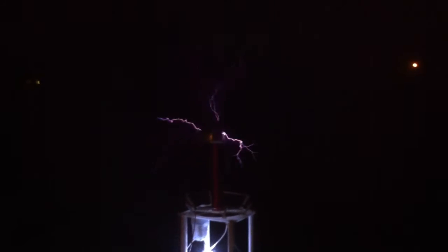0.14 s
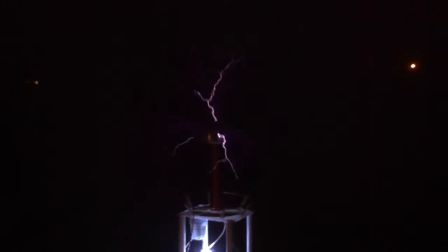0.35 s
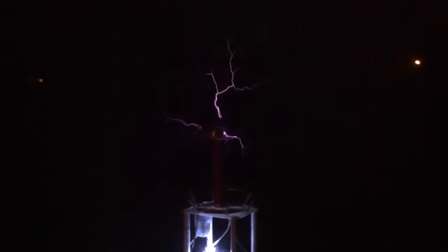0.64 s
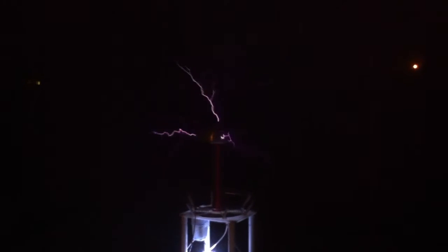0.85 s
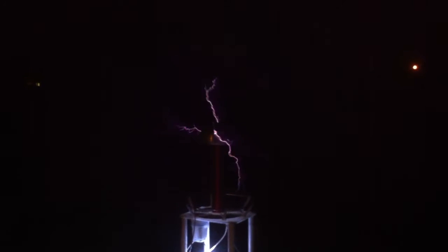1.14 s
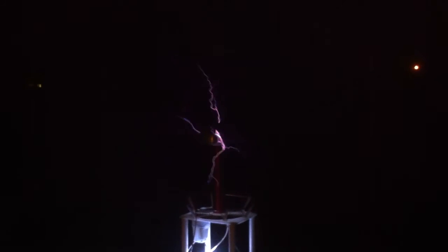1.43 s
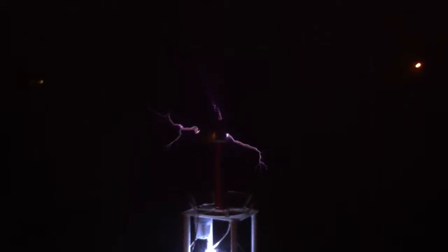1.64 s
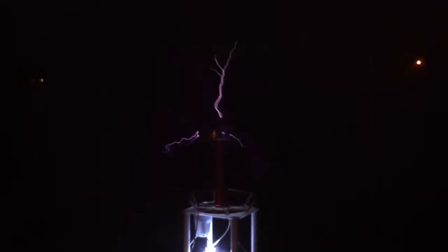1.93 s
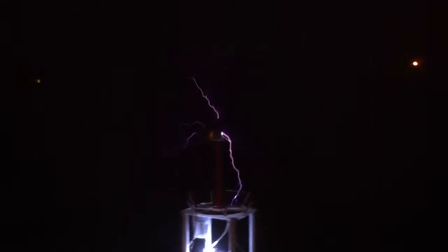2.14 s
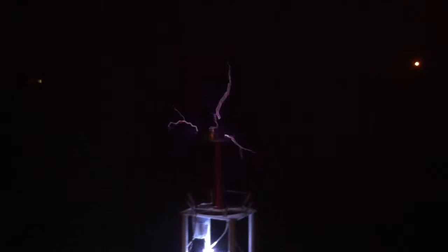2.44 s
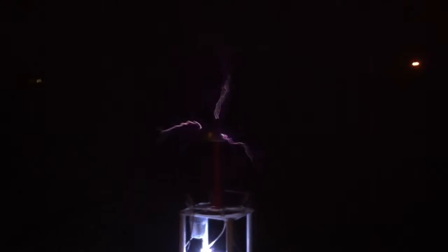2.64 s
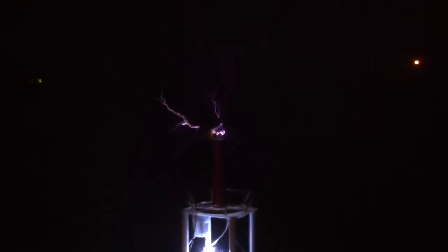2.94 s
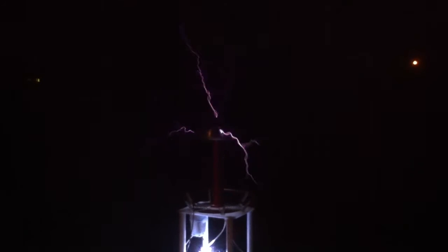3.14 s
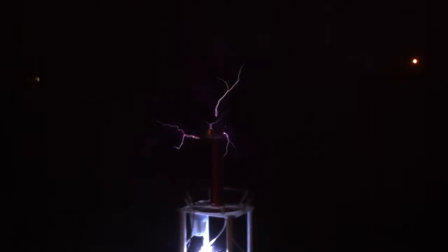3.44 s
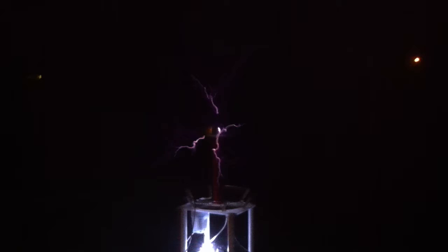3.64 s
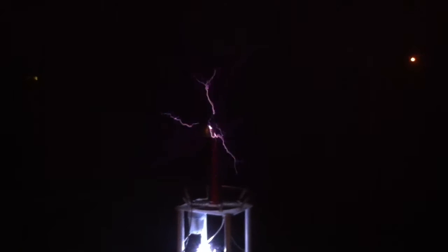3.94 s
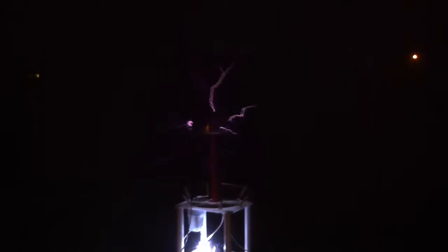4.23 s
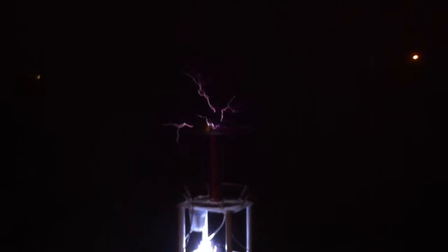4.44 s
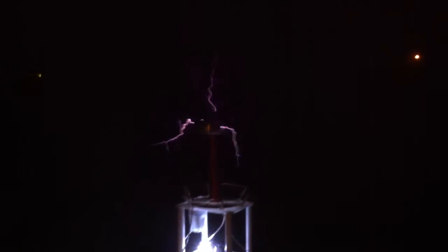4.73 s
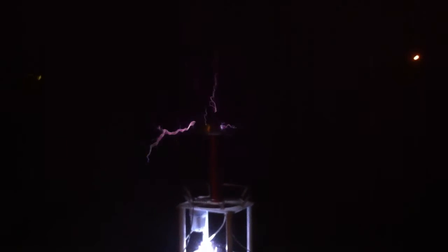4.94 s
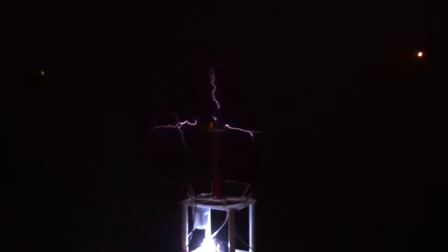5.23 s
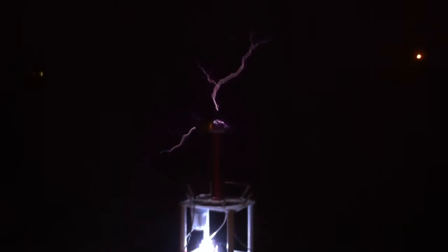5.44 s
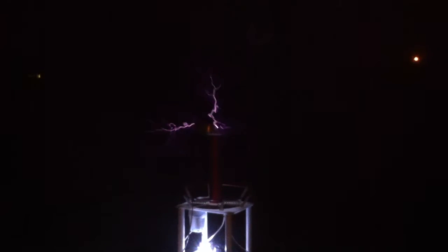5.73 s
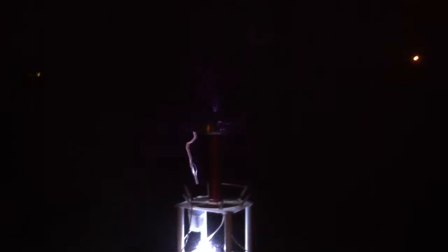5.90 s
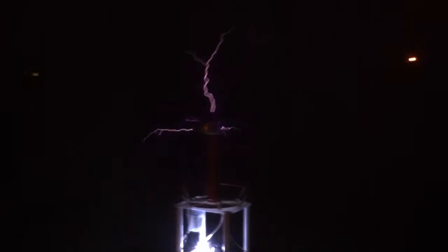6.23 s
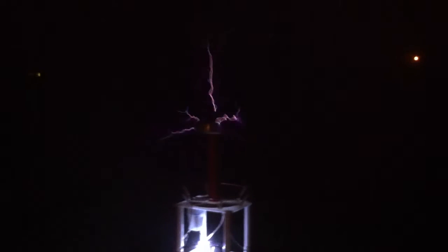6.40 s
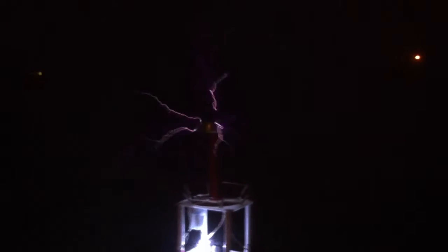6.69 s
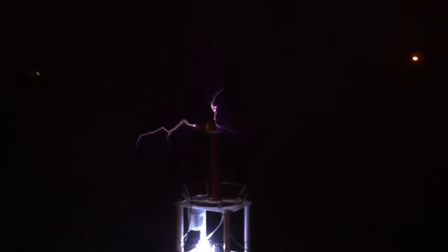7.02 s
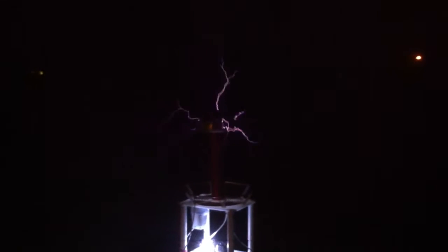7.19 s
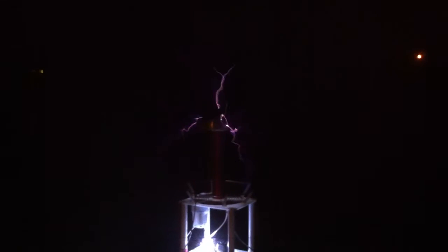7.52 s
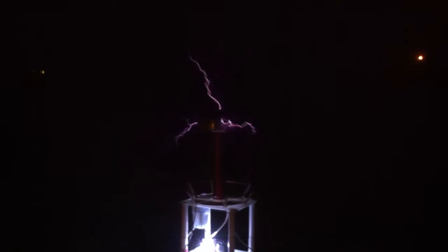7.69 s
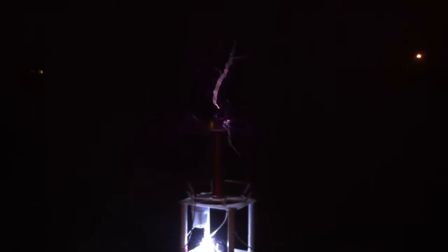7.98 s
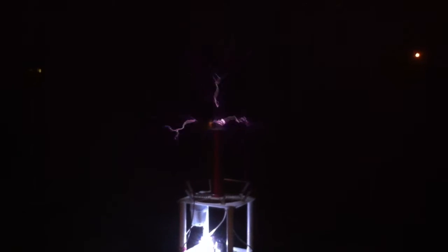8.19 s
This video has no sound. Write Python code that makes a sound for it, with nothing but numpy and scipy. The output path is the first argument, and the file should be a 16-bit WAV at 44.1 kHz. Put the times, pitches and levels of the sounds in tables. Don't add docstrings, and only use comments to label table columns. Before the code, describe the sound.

A high-voltage coil fires without pause, snapping about 120 times a second so the bangs fuse into a loud, rough, bright buzz. Wandering streamers make its body swell, thin and crackle irregularly. Hard surfaces return quick echoes and a short blurred tail. A very faint hum lies beneath. The small microphone sounds sharp and thin in the bass, with rounded peaks and a few soft air thumps.

```python
import sys
import numpy as np
from scipy import signal
from scipy.fft import rfft, irfft, next_fast_len
from scipy.io import wavfile
from scipy.ndimage import uniform_filter1d

SR = 44100
rng = np.random.default_rng(int(sys.argv[2]) if len(sys.argv) > 2 else 0)


def dump_mix(stems):
    frames = np.atleast_2d(stems).T
    limited = np.clip(frames, -1, 1)
    pcm = np.round(limited * 32767).astype(np.int16)
    wavfile.write(sys.argv[1], SR, pcm)


def volts_from_db(level):
    exponent = np.asarray(level, float) / 20
    return 10 ** exponent


N = 368235

BANG_HZ, FIRST_BANG_S = 120.048, .00050
JITTER_S, WANDER_S, POLARITY_LAG_S = 55e-6, 85e-6, 30e-6
BANG_SPREAD_DB, POLARITY_DB = 1.05, -.7
STREAMER_DB, SNAP_DB = -27.5, -21
HUM_RISE_DB_PER_S = 1.0
TRACE_SAMPLES = 128
ROOM_FOLLOWS = 0.59
RISE_FASTER = 1.14
ABRUPTNESS = 3.5
MIC_DB, TOP_CUT_HZ = -0.97, 15720

# frequency in Hz, level in dB rms.
HUM_LINES = [(120, -71.5), (180, -79)]
# time in seconds, level in dB.
THUMPS = [
    (.451, -55),
    (.467, -62),
    (.477, -51),
    (3.841, -58),
    (7.195, -68),
    (8.098, -63),
    (8.137, -61),
]
# centre in seconds, length in seconds, bass change in dB.
BASS_DIPS = [
    (.4595, .017, -24),
]
# frequency in Hz, width in Hz, gain
# in dB.
HARMONIC_TINTS = [(240, 40, -1), (724, 27, -2.5), (480, 40, 1), (958, 20, -2), (1070, 69, 1),
                  (1316, 27, -2.5), (1436, 100, 2), (1564, 40, -4), (1676, 67, 2), (1805, 60, -5),
                  (2290, 150, 0.5), (2560, 87, 1.5), (3060, 170, -1.5)]
# frequency in Hz, width in Hz, gain in dB.
WALL_COLOUR = [(350, 1000, -22), (5000, 1900, -7), (6900, 1300, 5)]
# centre in seconds, length in seconds, echo over direct in dB.
WALL_LEANS = [(.3, 0.5, -3.5), (.65, 0.25, -7.5), (1.1, .4, -4.5), (1.55, .3, 6), (1.95, 0.12, -1.5),
              (2.15, 0.073, 7), (2.4, 0.15, 0), (2.62, 0.11, -9), (2.97, 0.088, 9), (3.35, 0.52, 14.5),
              (3.7, 0.071, 18), (4.3, 0.17, 9), (5.2, 0.31, 6.5), (5.6, 0.18, -2), (6.2, 0.14, 2),
              (6.5, 0.12, -5), (7.22, 0.17, -7.5), (7.7, 0.24, -2), (8.15, 0.16, -2)]
# frequency in Hz, level in dB per Hz.
GAP_SPECTRUM = [(1940, -42), (3300, -18.5), (3760, -18), (5340, 3), (5770, -8.5), (6160, -4), (7340, -7.5),
                (8300, -0.5), (11100, -5), (12000, -8.5), (13100, -5), (14500, -12), (15600, -1.5)]
# frequency in Hz, width in Hz, gain in dB.
GAP_CAGE = [(5200, 1300, 9), (8450, 1300, 7), (12300, 4000, 1)]
# delay in seconds, level in dB, share of the lean.
GAP_ECHOES = [(.00015, -10, 0), (.00044, 0, 0), (.00115, -8, 0), (.00172, -4, .3), (.0027, -13, 0),
              (.0036, -11, 0), (.0042, -12, 0), (.0052, -16, 0), (.0076, -14, 0)]
# centre in seconds, length in seconds, gap snap in dB, branching in dB.
CHARGE_SURGES = [(0.15, 0.19, -2.5, -1), (0.4, 0.49, 0.5, 0), (0.76, 0.12, -1, 0), (0.96, 0.065, 1, 1.5),
                 (1.26, 0.086, 1, 0), (1.42, 0.15, -0.5, -1.5), (2.09, 0.2, 2, 1), (2.41, 0.24, -1, 0.5),
                 (2.6, 0.2, 2, 1), (2.84, 0.84, -0.5, -1), (3.3, 0.04, -2, -17), (3.89, 0.094, 2.5, 1.5),
                 (4.1, 0.15, 1, 0), (4.37, 0.04, -3, -6), (4.62, 0.11, -1, 0.5), (4.79, 0.074, -0.5, -0.5),
                 (5.07, 0.23, -1.5, -1), (5.23, 0.081, -1, -6), (5.42, 0.4, 0.5, 0.5),
                 (6.08, 0.11, -2, 1.5), (6.45, 0.15, 1, 1.5), (6.92, 0.058, 0.5, 1), (7.05, 0.25, 0, -0.5),
                 (7.22, 0.051, 1.5, 1.5), (7.71, 0.13, 1, 0.5), (8.25, 0.083, -0.5, -1), (.03, .06, 1, 2),
                 (.58, .12, .3, -1.2), (1.1, 0.11, -0.4, 0), (1.62, 0.13, .3, -0.7), (1.85, 0.13, -1, -.5),
                 (3.1, 0.14, 0.5, -0.6), (3.5, 0.22, .3, .3), (3.7, 0.21, -1, -.5), (4.25, .1, -0.5, 0),
                 (4.5, .1, -0.9, 0), (4.92, .1, 0, 0.9), (5.7, 0.14, 0.5, -0.1), (5.9, .15, -0.5, 0),
                 (6.25, .15, -0.5, 0.7), (6.7, .2, 0.7, -0.1), (7.45, 0.24, 0, 0.8), (7.95, 0.17, 0.4, 0.1)]
# frequency in Hz, level in dB per Hz.
STREAMER_SPECTRUM = [(35, -64), (60, -48), (237, -24.5), (320, -20.5), (353, -18.5), (390, -22), (558, -15),
                     (593, -14), (668, -15.5), (815, -11), (2040, -3.5), (3160, -9), (5300, 1.5),
                     (7000, -9), (9100, -37.5), (15400, -120)]
# delay in seconds, level in dB, share of the lean.
STREAMER_ECHOES = [(-.00015, -.5, -.5), (.0005, -6, -.3), (.00125, -4.5, 0), (.0021, -6, 0),
                   (.0031, -1.5, .5), (.0036, -8, .5), (.005, -11, 0), (.0073, -13, 0)]
# centre in seconds, length in seconds, strength in dB, reach in dB.
STREAMER_FLARES = [(0.16, 0.22, -5.5, -15), (0.44, 0.19, -4, 13), (0.67, 0.9, 2, -8.5),
                   (0.88, 0.16, -4.5, 2), (1.41, 0.19, -2.5, -5), (1.69, 0.23, -1.5, 9),
                   (1.86, 0.26, -0.5, -16), (2.35, 0.4, 0.5, -0.5), (2.61, 0.18, 1.5, -23),
                   (2.86, 0.22, -1.5, -22), (2.97, 0.071, 3.5, 11), (3.17, 0.32, -2, 7.5),
                   (3.6, 0.2, 1, -13), (3.92, 0.073, 2, 7), (4.24, 0.068, -2, 12), (4.81, 0.53, -1, 4),
                   (5.14, 0.064, 3, -2.0), (5.33, 0.057, 1, 19), (5.67, 1, 1, 2.5), (6.46, 1, 1, -7),
                   (6.99, 0.26, -1, -3), (7.22, 0.046, 3.5, 10), (7.32, 0.24, -1, -26),
                   (7.73, 0.075, -1, -19), (8.12, 0.72, -1.5, 0.5), (8.26, 0.14, -0.5, -8.5),
                   (1.1, 0.17, -0.3, -3), (2.1, .15, 0.8, -4), (2.25, .12, .3, 1), (3.4, .12, -1, 8),
                   (3.845, .025, 0.5, 16), (4.05, 0.11, 0.8, 0), (4.45, 0.11, 1.5, 4), (4.65, .12, .3, -3),
                   (5.02, 0.11, -0.5, 0), (5.6, .15, -0.5, -6), (5.85, 0.078, 0, -0.5), (6.1, .15, -1, 14),
                   (6.6, 0.12, 2.5, 1), (6.78, 0.11, -0.5, -10), (6.86, .06, -0.5, -5), (7.5, 0.14, 0, -1),
                   (7.9, .15, -1.3, 1)]
# centre in seconds, length in seconds, deepest buzz in dB.
ARC_STRETCHES = [(.2, .25, 3.5), (.62, .1, 10), (.78, .15, 2), (1.15, .1, 0.5), (1.4, 0.49, -0.5),
                 (1.75, .1, 6), (2.1, .17, 11), (2.3, 0.21, -3), (2.5, .17, 4), (2.85, .25, 5),
                 (3.05, 0.068, 6), (3.55, .5, -1), (4.1, .2, 3), (4.42, 0.15, 8), (4.65, 0.059, 7.5),
                 (4.85, .08, 3), (5.25, 0.11, -0.5), (5.75, 0.18, 6), (6.05, .1, 4), (6.3, 0.27, 13),
                 (6.5, 0.1, -2), (6.65, .08, 9), (6.82, 0.36, -5), (7.05, .1, 0), (7.7, 0.39, -2),
                 (8.0, 0.2, 4), (8.25, .2, 1)]
# frequency in Hz, width in Hz, gain in dB.
NARROW_COLOUR = [(5550, 140, 0), (8220, 490, 5.5), (9040, 190, 4), (9380, 98, 4.5), (6090, 310, 2),
                 (11880, 670, 6), (13400, 120, 8.5), (14220, 370, 6),
                 (4470, 300, 1.5), (5470, 140, 0.5), (6690, 210, 2.5), (6970, 220, -2.5), (7350, 330, 3),
              (9260, 150, -1.5), (10430, 250, -4), (10560, 270, 3), (11000, 240, -2), (12370, 460, 0.5),
              (13300, 240, -6), (13640, 250, 4), (14150, 250, -1.5), (14450, 400, 5), (15360, 260, -0.5)]


def at_hz(points, hz):
    point_hz, db = np.transpose(points)
    return np.interp(np.log(hz + 1), np.log(point_hz), db)


def humps(modes):
    return lambda hz: sum(db / (1 + (2 * (hz - mode_hz) / width_hz) ** 2) for mode_hz, width_hz, db in modes)


def swells(events, s):
    centre_s, length_s, *sizes_db = np.transpose(events)
    d = (s[:, None] - centre_s) / length_s
    d = 2.0 * d * np.where(d < 0, RISE_FASTER, 1)
    return np.array(sizes_db) @ np.exp(-np.abs(d) ** ABRUPTNESS).T


def colour(x, db_of_hz):
    size = next_fast_len(N + SR)
    cepstrum = irfft(np.log(volts_from_db(db_of_hz(np.arange(4097) * SR / 8192))))
    cepstrum[1:4096] *= 2
    cepstrum[4097:] = 0
    impulse = irfft(np.exp(rfft(cepstrum)))
    return irfft(rfft(x, size) * rfft(impulse, size), size)[:N]


def shelf(x, edge_hz, side, s, db):
    beyond = signal.sosfiltfilt(signal.butter(3, edge_hz, side, fs=SR, output="sos"), x)
    gain = volts_from_db(np.interp(np.arange(N) / SR, s, db - db.mean()))
    return x + beyond * (gain - 1)


def set_level(x, low_hz, high_hz, db):
    band = signal.sosfilt(signal.butter(4, [low_hz, high_hz], "band", fs=SR, output="sos"), x)
    return x * np.sqrt(np.mean(volts_from_db(db) ** 2) / np.mean(band ** 2))


def hum():
    t = np.arange(N) / SR
    out = np.zeros(N)
    for hz, db in HUM_LINES:
        locked_hz = round(2 * hz / BANG_HZ) * BANG_HZ / 2
        out += np.sqrt(2) * volts_from_db(db + HUM_RISE_DB_PER_S * t) * np.sin(2 * np.pi * locked_hz * t)
    return out


def thumps():
    clicks = np.zeros(N)
    for s, db in THUMPS:
        clicks[round(s * SR)] = volts_from_db(db + 50)
    return signal.sosfilt(signal.butter(2, [36, 330], "band", fs=SR, output="sos"), clicks)


def bangs():
    k = np.arange(int(N / SR * BANG_HZ))
    polarity = (-1) ** k
    chance = rng.standard_normal((len(k), 2))
    wander = signal.lfilter([.71], [1, -.7], chance[::-1, 1])
    times = FIRST_BANG_S + k / BANG_HZ
    times = times + JITTER_S * chance[:, 0] + WANDER_S * wander + POLARITY_LAG_S * polarity
    return times, BANG_SPREAD_DB * chance[:, 1] + POLARITY_DB * polarity


def wandering_kinks(count, keep):
    noise = rng.standard_normal((count + 50, TRACE_SAMPLES))
    return signal.lfilter([np.sqrt(1 - keep ** 2)], [1, -keep], noise, axis=0)[50:]


def channel_shapes(count, length_s, memory, steady, polar):
    t = np.arange(TRACE_SAMPLES) / SR
    kept = wandering_kinks(count, memory)
    flipping = wandering_kinks(count, -.2)
    kinks = np.sqrt(1 - polar) * kept + np.sqrt(polar) * flipping
    kinks[:, round(length_s * SR / 2)] += steady
    traces = kinks * np.sqrt(t / length_s) * np.exp(-(t / length_s) ** 2)
    return traces / np.linalg.norm(traces, axis=1, keepdims=True)


def fire(times, traces):
    at = np.round(times * SR).astype(int)[:, None] + np.arange(TRACE_SAMPLES)
    return np.bincount(at.ravel(), traces.ravel(), N + SR)[:N]


def echoes(times, level_db, paths, fading_db, **channel):
    out = 0
    lean_db = swells(WALL_LEANS, times)[0]
    for delay_s, db, leaning in paths:
        swing = signal.lfilter([.37], [1, -.93], rng.standard_normal(len(times)))
        path_db = level_db + db + leaning * lean_db + fading_db * swing
        traces = channel_shapes(len(times), **channel)
        path = fire(times + delay_s, traces * volts_from_db(path_db)[:, None])
        if leaning:
            path = colour(path, lambda hz: leaning * humps(WALL_COLOUR)(hz))
        out = out + path
    return out


def room(times, level_db, t60_s, wet_db, steady, count=7, **channel):
    size, t = next_fast_len(N + SR), np.arange(SR) / SR
    decay = (volts_from_db(-60 * t / t60_s) + 1.1 * np.exp(-t / 0.0053)) * (1 - np.exp(-t / 0.0023))
    tails = rng.standard_normal((count, SR)) * decay / np.linalg.norm(decay)
    gain = volts_from_db(ROOM_FOLLOWS * level_db)[:, None]
    sides = []
    for _ in tails:
        traces = channel_shapes(len(times), steady=0.26 * steady, **channel)
        sides.append(fire(times, traces * gain))
    blurred = irfft(np.sum(rfft(sides, size) * rfft(tails, size), axis=0), size)[:N]
    return volts_from_db(wet_db) * blurred / np.sqrt(count)


def gap(times, spread_db):
    bang_db = 1.67 * swells(CHARGE_SURGES, times)[0] + 0.75 * spread_db
    channel = dict(steady=7.5, length_s=.00042, memory=.75, polar=.06)
    near = echoes(times, bang_db, GAP_ECHOES, fading_db=.4, **channel)
    x = colour(near, humps(GAP_CAGE)) + room(times, bang_db, t60_s=.25, wet_db=3.6, **channel)
    sound = colour(x, lambda hz: at_hz(GAP_SPECTRUM, np.minimum(hz, 15300)) - 0.99 * humps(GAP_CAGE)(hz))
    return set_level(sound, 7340, 15240, SNAP_DB)


def streamer_db(hz):
    return at_hz(STREAMER_SPECTRUM, hz) - 3 * np.clip(hz / 1500 - 2, 0, 1) - 6 * np.clip(1.8 - hz / 120, 0, 1)


def streamers(times, spread_db):
    strength_db, reach_db = swells(STREAMER_FLARES, times)
    branching_db = np.clip(swells(CHARGE_SURGES, times)[1], -2.5, 4)
    bang_db = 2.01 * strength_db + spread_db
    channel = dict(steady=3.3, length_s=0.000526, memory=.92, polar=.12)
    x = echoes(times, bang_db, STREAMER_ECHOES, fading_db=1.0, **channel)
    x = x + room(times, bang_db, t60_s=0.48, wet_db=6.5, **channel)
    x = shelf(x, 2470, "high", times, 2.0 * branching_db - 1.09 * strength_db)
    x = shelf(x, 920, "low", times, 0.27 * reach_db - 1.93 * strength_db)
    x = shelf(x, 370, "low", times, swells(ARC_STRETCHES, times)[0])
    return set_level(colour(x, streamer_db), 610, 3020, STREAMER_DB)


def scene():
    times, spread_db = bangs()
    return (streamers(times, spread_db) + gap(times, spread_db) + hum())[None]


def thin_treble(x, under_db, moody_db):
    hz, _, spec = signal.stft(x, SR, nperseg=2048, noverlap=1024)
    power = np.abs(spec) ** 2
    around = uniform_filter1d(power, size=140, axis=0)
    mood = signal.lfilter([.8], [1, -.6], rng.standard_normal((65, power.shape[1])))
    mood = mood[np.arange(len(hz)) // 16]
    treble = np.clip(hz / 11000, 0, 1)[:, None] ** 1.2
    limit = around * volts_from_db(2 * (under_db + moody_db * mood)) * treble
    return signal.istft(spec * (power > limit), SR, nperseg=2048, noverlap=1024)[1][:N]


def low_pass(x):
    return signal.sosfilt(signal.butter(12, 16590, fs=SR, output="sos"), x)


def record(dry):
    x = colour(dry[0], humps(NARROW_COLOUR + HARMONIC_TINTS)) * volts_from_db(MIC_DB)
    x = .72 * np.tanh(x / .72)
    x = signal.sosfilt(signal.butter(4, 112, "high", fs=SR, output="sos"), x)
    t = np.arange(N) / SR
    x = shelf(x, 830, "low", t, swells(BASS_DIPS, t)[0]) + thumps()
    x = thin_treble(x, under_db=-5.0, moody_db=3.5)
    x = signal.sosfiltfilt(signal.ellip(12, .2, 45, TOP_CUT_HZ, fs=SR, output="sos"), x)
    return low_pass(x[None])


dry = scene()
out = record(dry)
dump_mix(out)
```